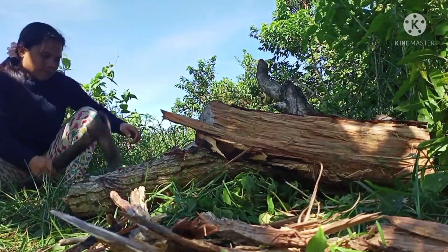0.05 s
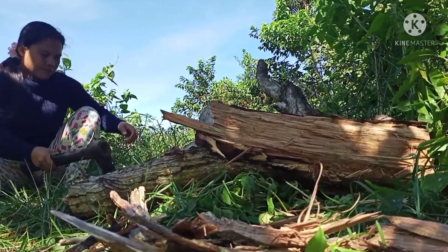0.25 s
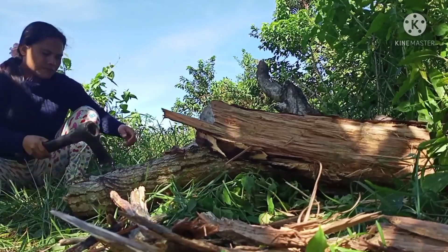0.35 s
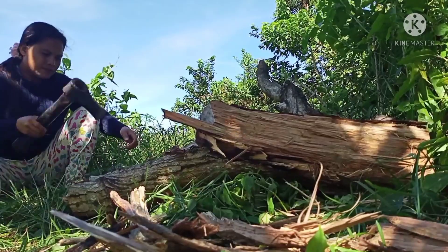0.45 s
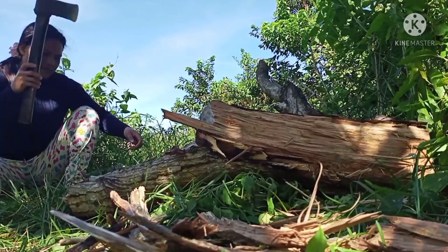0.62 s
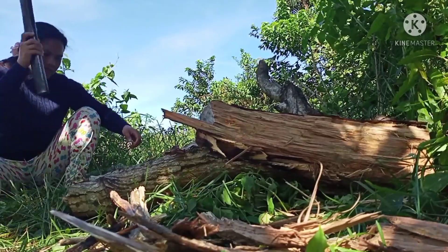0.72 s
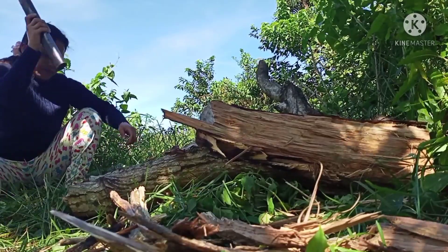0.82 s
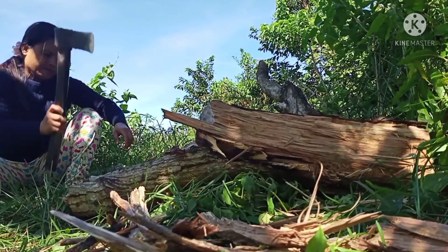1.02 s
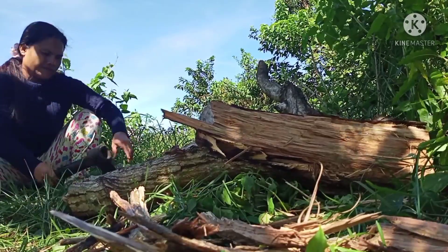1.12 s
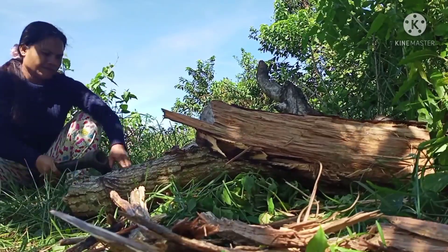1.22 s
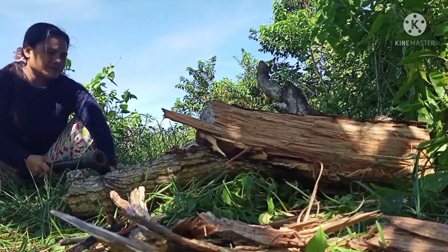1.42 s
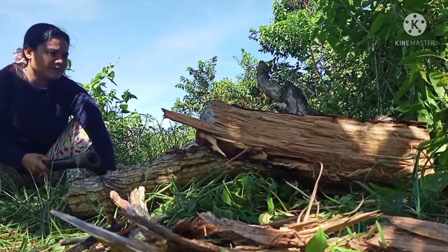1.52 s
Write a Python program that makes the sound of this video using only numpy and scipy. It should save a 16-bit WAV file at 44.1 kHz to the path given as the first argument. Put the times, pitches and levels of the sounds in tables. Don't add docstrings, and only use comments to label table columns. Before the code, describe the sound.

A heavy blade chops twice into a dry log outdoors, each blow a sharp woody crack

```python
import sys
import numpy as np
from scipy import signal
from scipy.fft import rfft, irfft
from scipy.io import wavfile
from scipy.ndimage import uniform_filter1d

SR = 44100
rng = np.random.default_rng(int(sys.argv[2]) if len(sys.argv) > 2 else 0)


def put_to_file(sound):
    columns = np.atleast_2d(sound).T
    safe = np.clip(columns, -1, 1)
    whole_steps = np.round(safe * 32767)
    wavfile.write(sys.argv[1], SR, whole_steps.astype(np.int16))


def invert_db(x):
    u = np.asarray(x, float) / 20
    return 10 ** u


N = 68355

# start_s, push_db, crush_db
BLOWS = [
    [(.2210, -15.5, -24), (.2225, 1.5, -10), (.2247, -5.5, 1.5), (.2266, -3, 0), (.2284, -15, -6.5)],
    [(1.2423, -19.5, -9), (1.2440, -1.5, -7), (1.2456, 2, -8.5), (1.2472, -1.5, 9.5), (1.2518, -4, -14)],
]


def colour(x, points):
    hz, db = np.array(points, float).T
    grid_hz = np.arange(2049) * SR / 4096
    log_gain = np.interp(np.log(grid_hz + 1), np.log(hz), db) * np.log(10) / 20
    cepstrum = irfft(log_gain)
    cepstrum[1:2048] *= 2
    cepstrum[2049:] = 0
    return signal.fftconvolve(x, irfft(np.exp(rfft(cepstrum))))[:len(x)]


def unit(x):
    return x / np.sqrt(np.mean(x ** 2))


def noise():
    return rng.standard_normal(N)


def band(x, hz, width_hz):
    return signal.lfilter(*signal.iirpeak(min(hz, .45 * SR), max(hz / width_hz, .3), fs=SR), x)


def walk(rate_hz):
    hold = int(SR / rate_hz)
    steps = np.repeat(rng.standard_normal(1000), hold)[:N + SR]
    w = uniform_filter1d(uniform_filter1d(steps, hold), hold)[:N]
    return (w - w.mean()) / w.std()


def bump(t, width_s):
    return np.exp(-.5 * (t / width_s) ** 2)


def fade(t, t60_s):
    return (t >= 0) * invert_db(-60 * np.maximum(t, 0) / t60_s)


def ring(push, modes, k):
    out = 0
    for hz, *level_db, t60_s in modes:
        pole = np.exp(2j * np.pi * hz / SR - np.log(1000) / (t60_s * SR))
        out = out + invert_db(level_db[k]) * signal.lfilter([1], [1, -pole], push).imag
    return out


def log_and_blade(t):
    # pitch_hz, first_blow_db, second_blow_db, t60_s
    log_modes = [(156, -14, -22, 0.093), (208.8, -12.5, -14, 0.028), (316.7, 0.5, -9, 0.066),
                 (411, -8.5, -10, .03), (494, -3.5, -3, 0.031), (697.3, -20, -23.5, .1),
                 (774, -19.5, -10, 0.031), (943, -39, -17, 0.054), (1450, -22, -12.5, 0.019),
                 (1643, -21, -44, .06), (2447, -25, -6.5, 0.013), (2923, -6, -22, .03)]
    # pitch_hz, first_blow_db, second_blow_db, t60_s
    blade_modes = [(1730, -38, -36, .07), (2080, -42, -42, .06), (3310, -41, -42, .07),
                   (3590, -46, -39, .1), (4400, -44, -50, .07), (4670, -48, -46, .07),
                   (5050, -41, -45, .07), (7810, -50, -48, .05), (8460, -50, -47, .06)]
    # delay_s, pitch_hz, level_db, t60_s
    ground_thuds = [
        (.014, 88, -31, 0.13),
        (.016, 81, -25, .14),
    ]
    level_db, push_s, thud_rise_s = -5.5, 0.0005, 0.0088
    radiate = signal.butter(4, 135, "high", fs=SR, output="sos")
    out = np.zeros(N)
    for k, blow in enumerate(BLOWS):
        push = sum(invert_db(db) * bump(t - s, push_s / 4) for s, db, _ in blow) / (push_s * SR / 1.767)
        click = sum(invert_db(db) * bump(t - s, 1 / SR) for s, _, db in blow) / 2.3
        wood = signal.sosfilt(radiate, ring(push, log_modes, k))
        steel = ring(click, blade_modes, k)
        delay_s, hz, thud_db, t60_s = ground_thuds[k]
        u = t - blow[0][0] - delay_s
        thud = invert_db(thud_db) * np.clip(u / thud_rise_s, 0, 1) * fade(u, t60_s) * np.sin(2 * np.pi * hz * u)
        out += thud - invert_db(level_db) * (wood + steel)
    return out


def fibres(t):
    # pitch_hz, density_db
    snap_colour = [(600, -22.5), (1500, -14), (2000, -5.5), (2600, 3), (3400, -11), (4200, -19.5),
                   (9000, -24.5), (15000, -27)]
    # pitch_hz, density_db
    splinter_colour = [(400, -11.5), (1100, -12.5), (1700, 2), (3500, 5), (4500, -8), (6500, -8),
                       (9000, -5.5), (15000, -23.5)]
    splinter_levels = [
        -29.5,
        -25.5,
    ]
    snap_db, snap_rise_s, snap_t60_s = -18, 0.00017, .008
    splinter_rise_s, splinter_t60_s, rough_db = 0.005, .09, 1.1
    snap, splinter = 0, 0
    for blow, splinter_db in zip(BLOWS, splinter_levels):
        for s, _, crush_db in blow:
            snap = snap + invert_db(crush_db) * fade(t - s, snap_t60_s) * np.clip((t - s) / snap_rise_s, 0, 1)
        u = t - blow[0][0]
        splinter = splinter + invert_db(splinter_db) * fade(u, splinter_t60_s) * np.clip(u / splinter_rise_s, 0, 1)
    snaps = invert_db(snap_db) * snap * unit(colour(noise(), snap_colour))
    return snaps + splinter * invert_db(rough_db * walk(500)) * unit(colour(noise(), splinter_colour))


def trees(t):
    # pitch_hz, density_db
    echo_colour = [(60, -2), (160, 10.5), (450, 0.5), (1100, -12), (2000, -4), (3300, -3.5), (4300, -13.5),
                   (15000, -25)]
    # level_db, nearest_trees_s, fullest_s
    echo_swells = [
        (-44, 0.023, 0.078),
        (-41.5, 0.049, 0.05),
    ]
    # after_blow_s, over_wash_db, length_s
    trunks_and_gaps = [
        [(.058, -2.5, .008), (.085, -3, 0.014), (.135, 3.5, 0.0072), (.19, 0.5, 0.0091)],
        [(.06, 0.5, .008), (.09, 4, 0.0062), (.11, 3, .005), (.155, -1, 0.021)],
    ]
    rise_s, near_t60_s, far_db, far_t60_s = .025, .5, -15.5, 1
    patchy_db, grain_db, treble_gain_db_per_khz_s = 1.2, 3, 0.5
    env = 0
    for blow, (level_db, first_s, full_s), trunks in zip(BLOWS, echo_swells, trunks_and_gaps):
        u = t - blow[0][0]
        swell_db = -3 * np.clip((full_s - u) / (full_s - first_s), 0, 1)
        rise = np.clip((u - first_s) / rise_s + 1, 0, 1) * invert_db(swell_db)
        trunk_db = sum(db * bump(u - s, length_s) for s, db, length_s in trunks)
        late = np.maximum(u - full_s, 0)
        decay = fade(late, near_t60_s) + invert_db(far_db) * fade(late, far_t60_s)
        env = env + invert_db(level_db) * rise * invert_db(trunk_db) * decay
    first_blow_s, second_blow_s = BLOWS[0][0][0], BLOWS[1][0][0]
    since_s = t - np.where(t < second_blow_s, first_blow_s, second_blow_s)
    wash = 0
    for hz in 60 * 2. ** np.arange(0, 8.3, 1 / 3):
        db = patchy_db * walk(25) + grain_db * walk(120) + treble_gain_db_per_khz_s * hz / 1000 * since_s
        wash = wash + invert_db(db) * band(noise(), hz, hz / 4)
    return env * unit(colour(wash, echo_colour))


def ticks(t):
    # start_s, level_db, pitch_hz, width_hz, length_s
    puffs = [
        (0.039, -63, 1770, 700, 0.011),
        (0.2, -77, 10600, 12000, 0.007),
        (0.47, -78, 8400, 854, 0.0077),
        (0.48, -70, 5570, 2000, 0.0044),
        (0.656, -67, 436, 292, 0.071),
        (0.87, -65, 2060, 900, 0.0094),
        (1.019, -63, 1930, 1490, .005),
        (1.207, -72.5, 8450, 3060, 0.0035),
        (1.22, -68.5, 7900, 12000, 0.0095),
        (1.53, -76, 3000, 4000, 0.012),
    ]
    out = 0
    for s, db, hz, width_hz, length_s in puffs:
        puff = unit(band(band(noise(), hz, width_hz), hz, width_hz))
        out = out + invert_db(db) * bump(t - s, length_s / 2) * puff
    return out


def air():
    # pitch_hz, density_db
    air_colour = [(35, -13), (110, 1), (200, -3.5), (500, -19.5), (1100, -19), (3300, -21), (5200, -36),
                  (14000, -37.5)]
    level_db, swell_db, flicker_db, gust_db, gust_per_s = -58, .3, 1.2, 3.5, 12
    out, swell = 0, walk(2.4)
    for hz in 40 * 2. ** np.arange(9):
        db = swell_db * swell + (flicker_db + gust_db * min(100 / hz, 1)) * walk(gust_per_s)
        out = out + invert_db(db) * band(noise(), hz, hz)
    return invert_db(level_db) * unit(colour(out, air_colour))


def insect(t):
    # time_s, pitch_hz, level_db
    whine = [
        (0, 5400, -97),
        (.45, 5450, -95),
        (.52, 5450, -84),
        (.9, 5450, -83),
        (1.1, 5450, -83),
        (1.19, 5650, -79),
        (1.25, 5600, -88),
        (1.55, 5500, -88),
    ]
    width_hz = 80
    s, hz, db = np.array(whine).T
    slow = signal.lfilter(*signal.butter(2, width_hz, fs=SR), rng.standard_normal((2, N)))
    phase = 2 * np.pi * np.cumsum(np.interp(t, s, hz)) / SR
    tone = (1 + unit(slow[0])) * np.cos(phase) + unit(slow[1]) * np.sin(phase)
    return invert_db(np.interp(t, s, db)) * unit(tone)


def bird(t):
    # start_s, length_s, pitch_hz, level_db
    whistles = [
        (.446, .075, 2600, -65),
        (.657, .05, 4400, -78),
    ]
    rise_s, waver = 0.0089, .003
    out = 0
    for s, length_s, hz, db in whistles:
        env = np.clip((t - s) / rise_s, 0, 1) * np.clip((s + length_s - t) / length_s, 0, 1) ** .5
        phase = 2 * np.pi * np.cumsum(hz * (1 + waver * walk(55))) / SR
        out = out + invert_db(db) * env * np.sin(phase)
    return out


def scene():
    t = np.arange(N) / SR
    chops = log_and_blade(t) + fibres(t) + trees(t)
    return (chops + ticks(t) + air() + insect(t) + bird(t))[None]


def roll_off(x):
    return signal.sosfilt(signal.butter(12, 16460, fs=SR, output="sos"), x)


def record(dry):
    # pitch_hz, gain_db
    phone_colour = [(5200, 2), (6600, -5.5), (7500, 1.5), (8500, 10), (9500, 2), (10400, -4.5),
                    (11200, -0.5), (12000, -5.5)]
    low_cut_hz, top_hz, ceiling = 64, 15600, 1.05
    x = colour(dry[0], phone_colour)[None]
    x = signal.sosfilt(signal.butter(2, low_cut_hz, "high", fs=SR, output="sos"), x)
    x = ceiling * np.tanh(x / ceiling)
    x = signal.sosfilt(signal.ellip(8, .2, 40, top_hz, fs=SR, output="sos"), x)
    return roll_off(x)


dry = scene()
out = record(dry)
put_to_file(out)
```